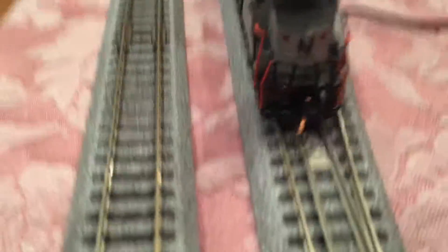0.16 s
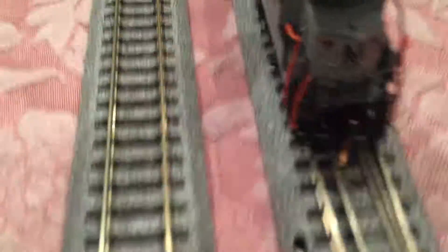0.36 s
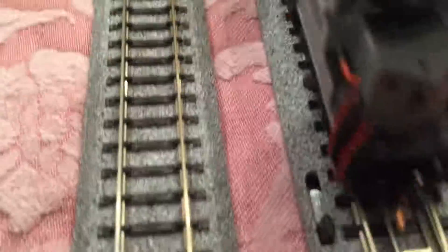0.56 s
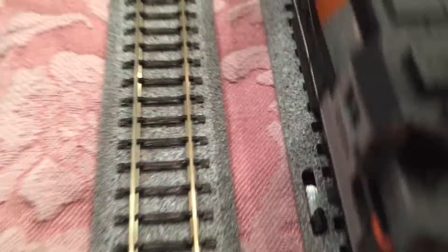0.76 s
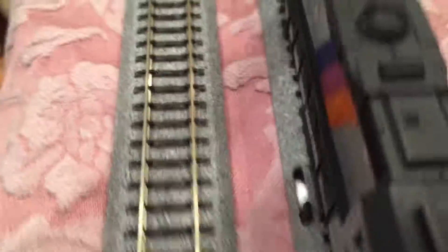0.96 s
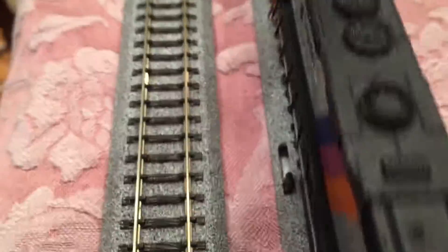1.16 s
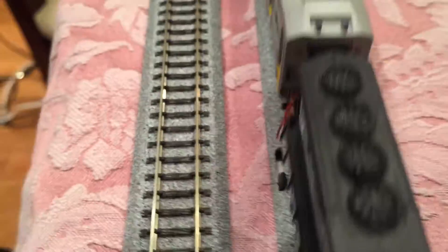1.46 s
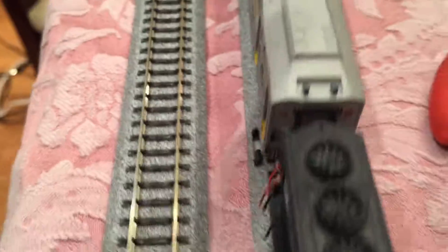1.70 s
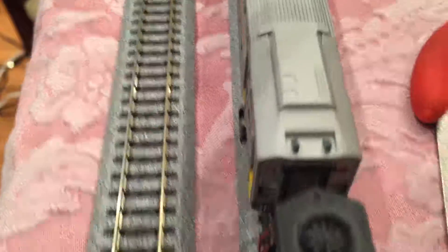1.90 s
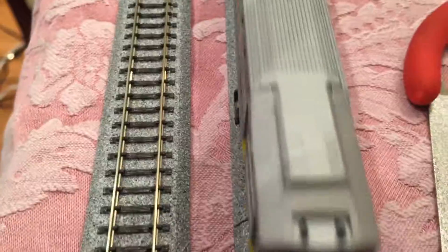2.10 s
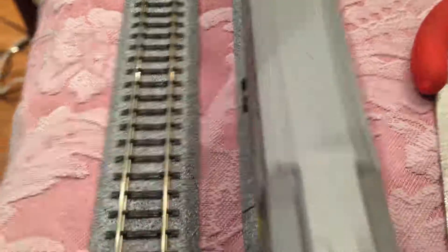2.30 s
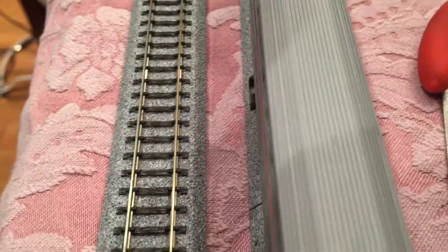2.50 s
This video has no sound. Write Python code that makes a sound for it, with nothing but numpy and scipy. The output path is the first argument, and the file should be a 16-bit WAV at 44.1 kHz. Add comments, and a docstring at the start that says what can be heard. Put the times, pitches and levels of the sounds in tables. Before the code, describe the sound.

A small model train whirrs past close by, with a thin high whine and light rail clicks

```python
"""A model locomotive rolls over a set of points and past a close microphone at a nearly steady speed.
From the start its shell whirrs (shaped noise), its motor drive whines (sine tones), its wheels tick on
rail gaps (short noise bursts) and the table rumbles (low noise) and bumps softly (fading low tones).
The wheels, front gears, motor and rear gears then stand out in turn, as noise chopped by the shaft.
The whine fades near the middle and swells again, strongest while the rear gears go by."""
import sys
import numpy as np
from scipy import signal
from scipy.fft import rfft, irfft, next_fast_len
from scipy.io import wavfile
from scipy.ndimage import map_coordinates

SR = 44100
rng = np.random.default_rng(int(sys.argv[2]) if len(sys.argv) > 2 else 0)


def file_out(sig):
    """Save sig as 16-bit WAV at sys.argv[1]."""
    # one column per channel
    cols = np.atleast_2d(sig).T
    # limit, then scale
    lim = np.clip(cols, -1, 1)
    pcm = np.round(lim * 32767).astype(np.int16)
    wavfile.write(sys.argv[1], SR, pcm)


N = 116865

SWAY_DB = 0.35  # size of the small random level changes in the shell and the passing parts


def amp(db):
    """Turn dB into a plain multiplier."""
    return 10 ** (np.asarray(db) / 20)


def unit(x):
    """Scale x to an average strength (rms) of 1."""
    return x / np.sqrt(np.mean(x ** 2) + 1e-20)


def clock():
    """The time of every sample in seconds."""
    return np.arange(N) / SR


def curve(rows):
    """Join (seconds, value) points by straight lines, one value per sample."""
    return np.interp(clock(), *np.transpose(rows))


def wobble(rate):
    """A smooth random curve through `rate` random points a second."""
    points = rng.standard_normal(4096)
    return map_coordinates(points, [np.arange(N) * rate / SR], mode="wrap")


def filtered(x, response):
    """Multiply each frequency in x by response(frequency in Hz)."""
    size = next_fast_len(N + 8192)  # spare room so the end does not wrap onto the start
    spectrum = rfft(x, size) * response(np.fft.rfftfreq(size, 1 / SR))
    return irfft(spectrum, size)[:N]


def coloured(x, points):
    """Shape x by (Hz, dB) points joined on a log pitch axis, then set its rms to 1."""
    hz, db = np.transpose(points)
    return unit(filtered(x, lambda f: amp(np.interp(np.log(f + 1), np.log(hz), db))))


def resonate(x, modes):
    """Pass x through steep-sided resonances, then set its rms to 1."""
    def response(f):
        power = 0
        for hz, width, db in modes:
            power = power + amp(db) ** 2 / (1 + ((f - hz) / width) ** 2 * 2) ** 3
        return np.sqrt(power)
    return unit(filtered(x, response))


def grit(rough_db):
    """Countless tiny contacts of uneven strength: noise whose level jitters quickly."""
    return rng.standard_normal(N) * amp(rough_db * wobble(900))


def ringing(t60):
    """A body's many close modes: noise smeared by a fading noise that drops 60 dB in t60 seconds."""
    age = clock()[:SR // 6]
    modes = rng.standard_normal(len(age)) * amp(-60 * age / t60)
    return unit(signal.fftconvolve(rng.standard_normal(N + len(age) - 1), modes, "valid"))


def passing(modes, motion, turn):
    """One part rasps in step with the shaft, swelling and fading as it goes by."""
    nearest, half_time, db, once_db, twice_db = motion
    chop = amp(once_db * np.cos(turn) + twice_db * np.cos(2 * turn))
    steepness = 4  # higher makes the swell flatter on top and steeper at its sides
    near = 1 / np.sqrt(1 + np.abs((clock() - nearest) / half_time) ** steepness)
    # The frame and track ring briefly along with the rough contacts.
    rasp = grit(rough_db=3.0) + amp(-2) * ringing(t60=0.045)
    level = amp(db + SWAY_DB * wobble(25.1))
    return level * near * resonate(chop * rasp, modes)


def running_gear():
    """Wheels, gears and motor, all turned by one shaft whose speed wavers a little."""
    # Motor speed. Each row: time in seconds, turns a second before the random waver.
    shaft_speed = [(0, 112), (1.15, 114), (1.7, 110.5), (2.25, 120), (2.65, 110.5)]
    # Resonances of each part. Each row: pitch in Hz, width in Hz, level in dB against the other rows.
    wheel_modes = [(2390, 420, -2.5), (2890, 510, -0.5), (3540, 390, -7), (5390, 640, -6), (5940, 360, 0),
                   (6570, 800, -2.5), (7600, 980, -9), (9180, 1300, -7.5), (12900, 3700, -12.5),
                   (15300, 1200, -17)]
    front_gear_modes = [(1110, 250, -9.5), (2340, 400, 5.5), (3360, 500, 0), (4360, 440, 4.5),
                        (5260, 930, -6), (7130, 990, -1), (9000, 1700, -9), (11300, 690, 0),
                        (12500, 700, -5), (13230, 1400, -0.5), (14000, 550, -3.5)]
    motor_modes = [(2070, 290, 1), (4030, 370, 3), (4400, 560, -16), (5500, 720, -10.5), (6350, 660, -5.5),
                   (6930, 760, -5.5), (8750, 500, -5.5), (10900, 620, -11.5), (12040, 870, -8),
                   (14300, 1100, -37)]
    rear_gear_modes = [(2720, 230, -1.5), (3210, 350, 4.5), (3870, 450, 1.5), (6180, 1100, -6),
                       (7070, 500, -9), (8400, 960, -5.5), (9480, 800, -5), (11400, 730, -13),
                       (13200, 1500, -8.5), (15100, 1100, -8.5)]
    # How each part goes by, one row: nearest time in seconds, half-time of the swell in seconds,
    # level in dB before the sway, strength in dB of the chop once a turn, and of the chop twice a turn.
    wheel_pass = (.46, .47, -42, .7, .9)
    front_gear_pass = (1.09, .19, -41.7, 1.2, 3.6)
    motor_pass = (1.75, .33, -42.3, 3.5, .9)
    rear_gear_pass = (2.26, .2, -39.4, 1.3, 2.6)

    turns_per_second = curve(shaft_speed) + 0.74 * wobble(8.56)
    turn = 2 * np.pi * np.cumsum(turns_per_second) / SR  # shaft angle in radians
    return (passing(wheel_modes, wheel_pass, turn)
            + passing(front_gear_modes, front_gear_pass, turn)
            + passing(motor_modes, motor_pass, turn)
            + passing(rear_gear_modes, rear_gear_pass, turn))


def shell():
    """The gear train keeps the plastic body whirring: rough noise plus the body's own ringing."""
    # Colour of the whirr. Each row: pitch in Hz, level in dB per Hz against the other rows.
    body_colour = [(520, -30), (700, -17.5), (850, -12.5), (1000, -10.5), (1200, -7), (1380, -5),
                   (1650, -2), (2000, 0.5), (2400, -6.5), (2750, -8.5), (3200, -4), (3900, -3.5),
                   (4550, -5.5), (4800, -14.5), (5100, -20), (5600, -20), (6150, -16.5), (7000, -12),
                   (7500, -21.5), (8700, -11), (10400, -17.5), (11200, -15.5), (12500, -24), (13300, -13),
                   (15700, -15.5)]
    # Loudness of the whirr. Each row: time in seconds, level in dB before the sway.
    body_level = [(0, -45), (.5, -42.5), (1, -41), (1.5, -40), (2, -41), (2.4, -39.5), (2.65, -38.5)]
    body = grit(rough_db=2.0) + amp(2.5) * ringing(t60=0.15)
    level = amp(curve(body_level) + SWAY_DB * wobble(18))
    return level * coloured(body, body_colour)


def shaded(x):
    """The treble rises and dips several times along the pass and sinks at the end."""
    # Treble changes. Each row: time in seconds, level of the treble in dB.
    treble_level = [(0, 0.5), (.4, -1.6), (.65, 0.5), (.8, -2), (1.22, 0.4), (1.37, -0.5), (1.5, 1),
                    (1.97, 0.5), (2.07, -2), (2.22, 0.5), (2.4, -1.5), (2.53, 1.5), (2.65, -2.5)]
    treble_hz = 4900  # the treble starts around here
    highs = filtered(x, lambda hz: 1 - 1 / (1 + (hz / treble_hz) ** 8))
    return x + (amp(curve(treble_level)) - 1) * highs


def tone(hz, flutter_db, drift):
    """A sine tone whose level flutters and whose phase drifts (drift in radians)."""
    phase = 2 * np.pi * hz * clock() + drift * wobble(12)
    return np.sqrt(2) * amp(flutter_db * wobble(21.94)) * np.sin(phase)


def whine():
    """The thin main whine, a wavering ring just above that beats against it, and the body's halo."""
    # Loudness of the whine. Each row: time in seconds, level in dB of the main tone before its flutter.
    whine_level = [(0, -48), (.3, -44), (.7, -44), (.85, -49), (.95, -52.5), (1.3, -60), (1.5, -52),
                   (1.8, -47.5), (2, -42.5), (2.3, -41), (2.48, -44), (2.57, -50), (2.65, -48)]
    whine_hz, ring_hz, halo_width_hz = 3005.3, 3071, 140
    main = tone(whine_hz, flutter_db=0.9, drift=0.06)
    ring = unit(tone(ring_hz, flutter_db=3.5, drift=0.94))
    halo = resonate(rng.standard_normal(N), [(ring_hz, halo_width_hz, 0)])
    return amp(curve(whine_level)) * (main + amp(-6) * ring + amp(-5.5) * halo)


def drive_tones():
    """Weaker fixed pitches of the motor drive, each loudest at its own point of the pass."""
    # Each row: pitch in Hz, top level in dB before flutter, loudest time in seconds,
    # fall in dB for each second away from that time.
    drive_pitches = [(831, -66.5, 1.5, 1), (842, -68, 1.5, 1), (1073.3, -57.3, 1.3, 2),
                     (1536.3, -56, 2.1, 3), (1682.3, -53, 2.2, 3), (1981, -59, 1.6, 5),
                     (2146.3, -50.5, 1.1, 6), (4584, -54.5, 1.4, 4), (5907.7, -58.5, .7, 6),
                     (6054, -59, .4, 6), (6516.8, -55.5, .5, 5), (6752, -61, .4, 5), (15207.7, -61, 1.8, 2)]
    out = np.zeros(N)
    for hz, db, loudest, fall in drive_pitches:
        level = amp(db - fall * np.abs(clock() - loudest))
        out += level * tone(hz, flutter_db=1.56, drift=0.068)
    return out


def ticks():
    """Wheels crossing rail gaps click: bright noise that starts fast, dies fast and has its own pitch."""
    # Wheels on rail gaps. Each row: start in seconds, level in dB before the shared trim and the
    # rise and fall, brightest pitch in Hz.
    gaps = [(0.092, -26, 5600), (0.117, -36, 5400), (.128, -32, 5500), (.1624, -29, 5960),
            (0.5189, -27, 9300), (0.634, -24, 6530), (.8375, -24.5, 3060), (1.0173, -25.5, 7300),
            (1.1224, -28, 11500), (1.2208, -27.5, 7200), (1.249, -28, 6950), (1.4224, -26.5, 3820),
            (1.8623, -29, 6400), (2.2174, -30, 8500)]
    # Colour shared by all clicks. Each row: pitch in Hz, level in dB against the other rows.
    click_colour = [(1500, -34), (3000, 11), (4500, 0), (5600, 0.5), (7200, -1), (9000, -2.5), (12000, -4),
                    (15500, -11)]
    t60, rise_s = 0.012, 0.00041  # seconds to fall by 60 dB, seconds setting the rise
    trim_db, ping_db = -2, -4  # shared trim, and each gap's own resonance against the crack
    crack = coloured(rng.standard_normal(N), click_colour)
    out = np.zeros(N)
    for start, db, hz in gaps:
        age = np.maximum(clock() - start, 0)
        ping = resonate(rng.standard_normal(N), [(hz, 0.15 * hz, 0)])
        rise = 1 - np.exp(-age / rise_s)
        fade = amp(db + trim_db - 60 * age / t60)
        out += fade * rise * (crack + amp(ping_db) * ping)
    return out


def thumps():
    """The table booms softly now and then under the moving weight: a low tone that swells and fades."""
    # Soft bumps. Each row: start in seconds, level in dB before the shared trim.
    bumps = [(0.082, -40.5), (0.43, -38), (1.096, -37), (1.29, -44), (1.701, -36.5), (1.783, -35.5),
             (2.373, -40)]
    boom_hz, peak_s, trim_db = 116.4, 0.014, -7  # pitch in Hz, seconds to the fullest swell, trim in dB
    out = np.zeros(N)
    for start, db in bumps:
        age = np.maximum(clock() - start, 0)
        swell = age / peak_s * np.exp(1 - age / peak_s)
        out += amp(db + trim_db) * swell * np.sin(2 * np.pi * boom_hz * age)
    return out


def rumble():
    """Low rumble of the table and the room: low-pitched noise that sways gently in level."""
    # Colour of the rumble. Each row: pitch in Hz, level in dB per Hz against the other rows.
    rumble_colour = [(22, -19), (40, -33), (52, -4), (63, -4.5), (82, -8), (100, -6), (118, 3), (135, -0.5),
                     (157, -8), (187, -5), (255, -12.5), (300, -16), (430, -17.5), (520, -25.5),
                     (580, -13.5), (690, -32.5), (900, -54)]
    level = amp(-52 + 0.8 * wobble(9.17))
    return level * coloured(rng.standard_normal(N), rumble_colour)


def scene():
    """The whole pass at one microphone; the treble changes touch only the shell and running gear."""
    train = shaded(running_gear() + shell())
    return (train + whine() + drive_tones() + ticks() + thumps() + rumble())[None]


def record(dry):
    """Nothing is kept at or above the band limit."""
    top_hz = 15750
    return np.array([filtered(channel, lambda hz: hz < top_hz) for channel in dry])


dry = scene()
out = record(dry)
file_out(out)
```